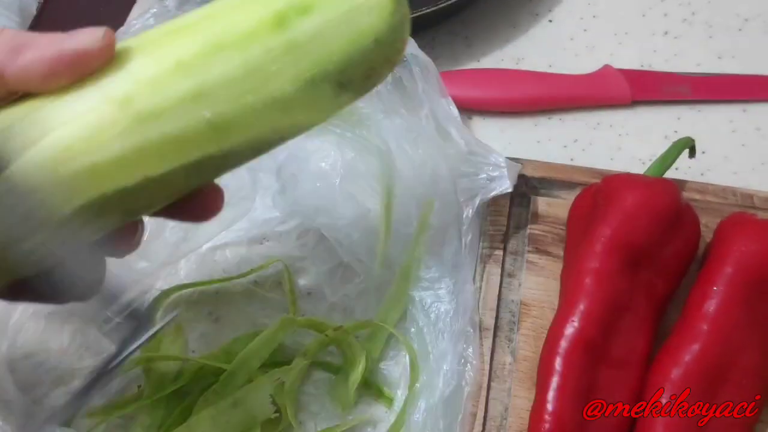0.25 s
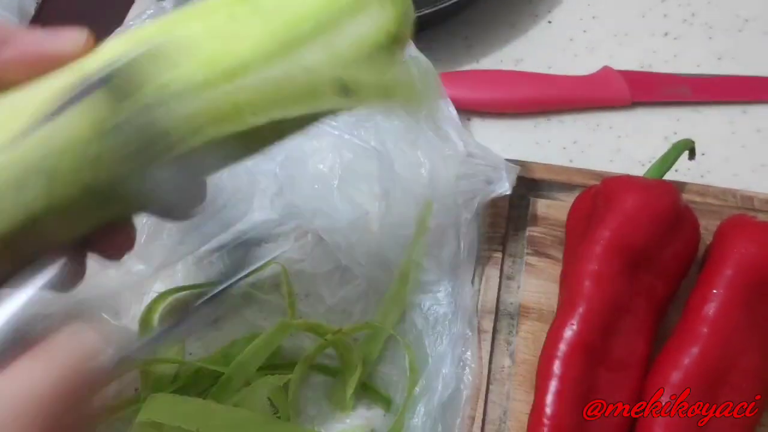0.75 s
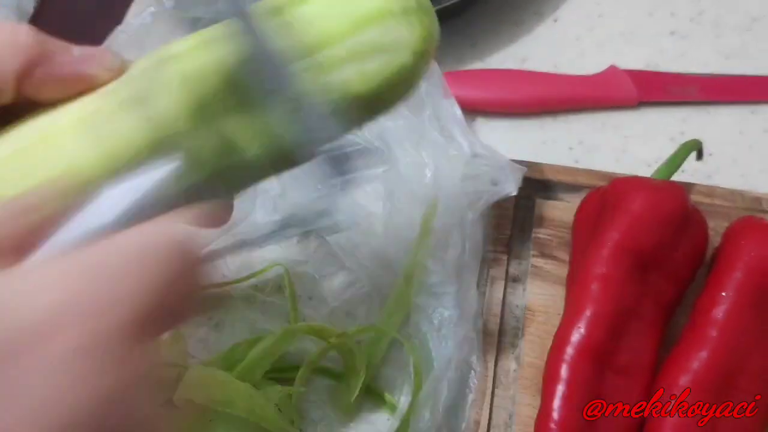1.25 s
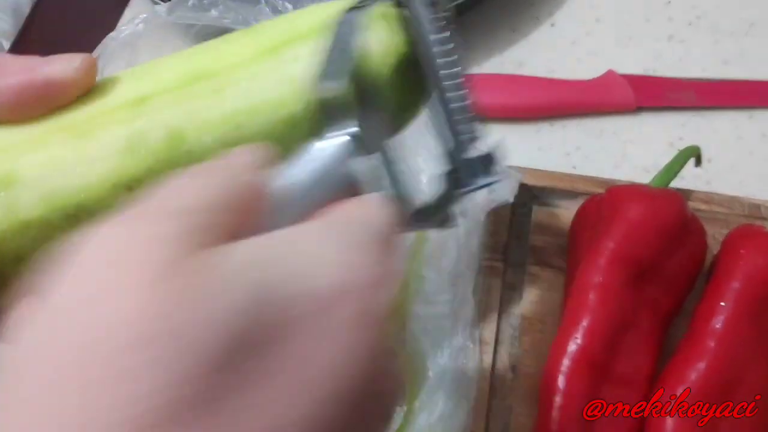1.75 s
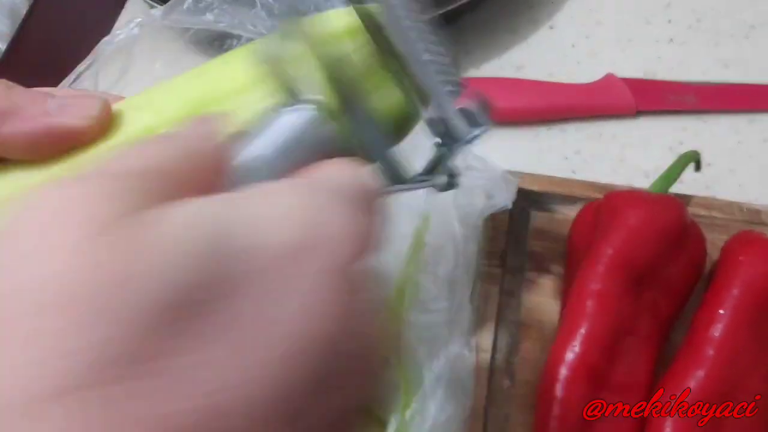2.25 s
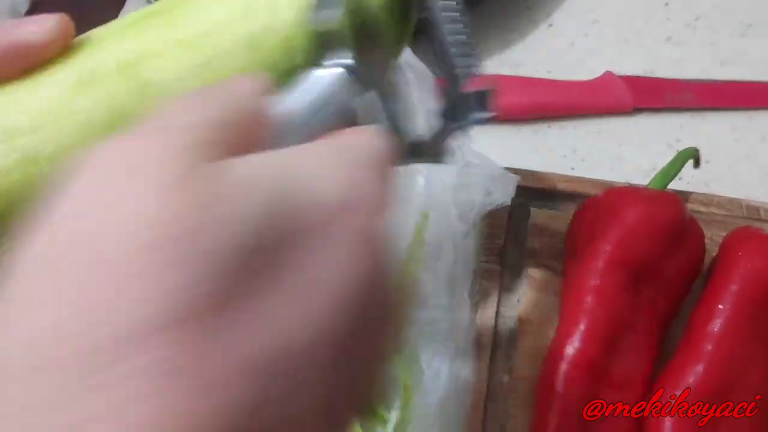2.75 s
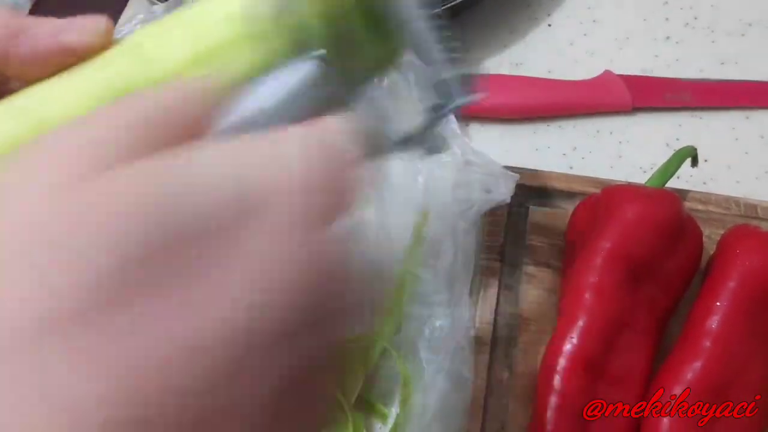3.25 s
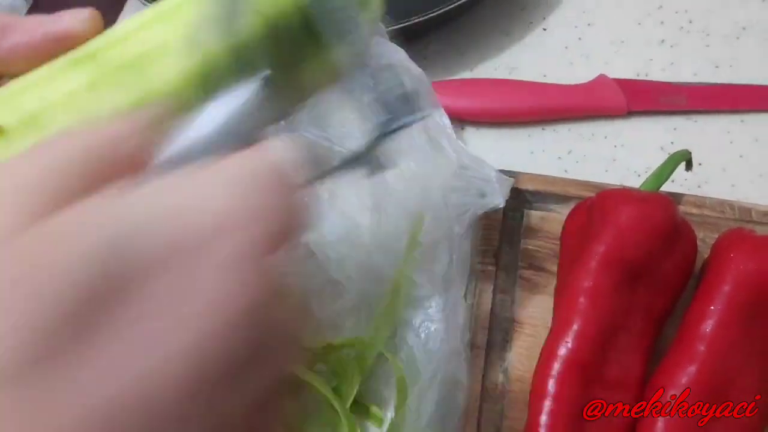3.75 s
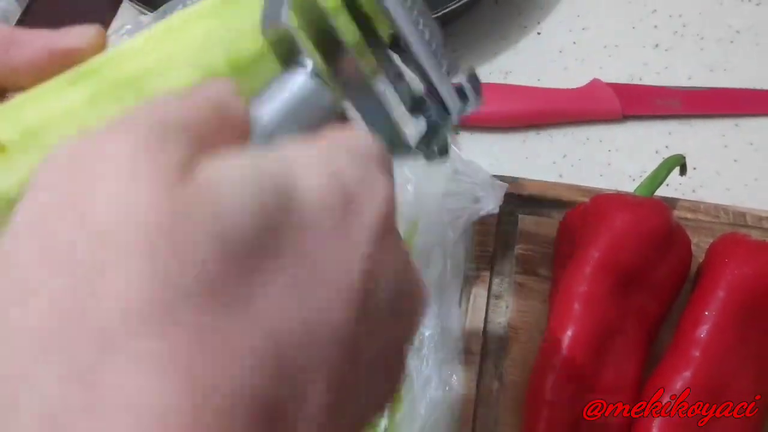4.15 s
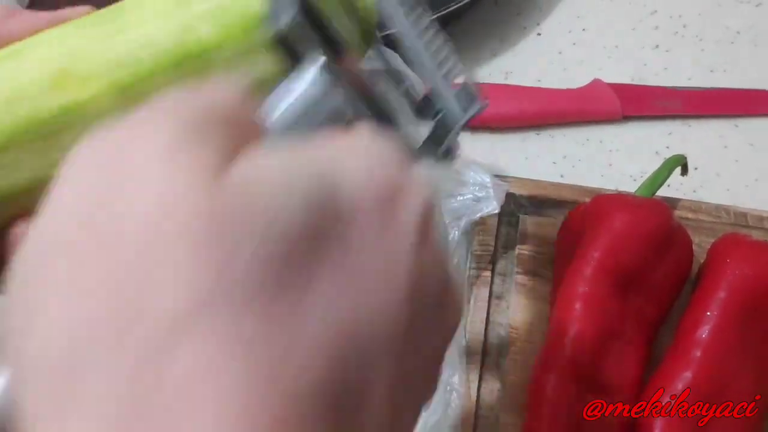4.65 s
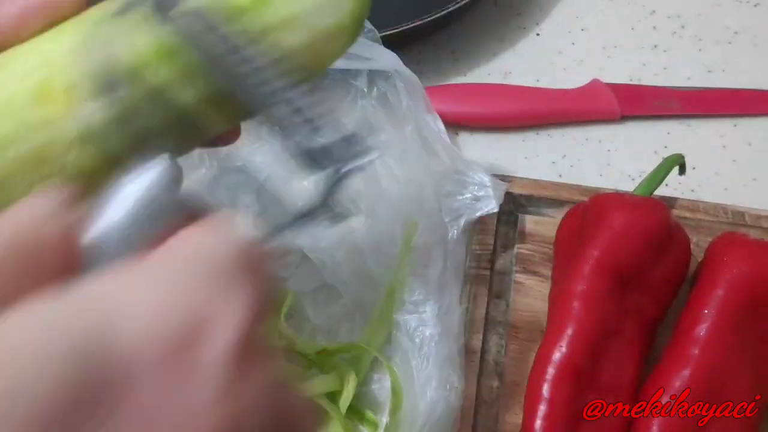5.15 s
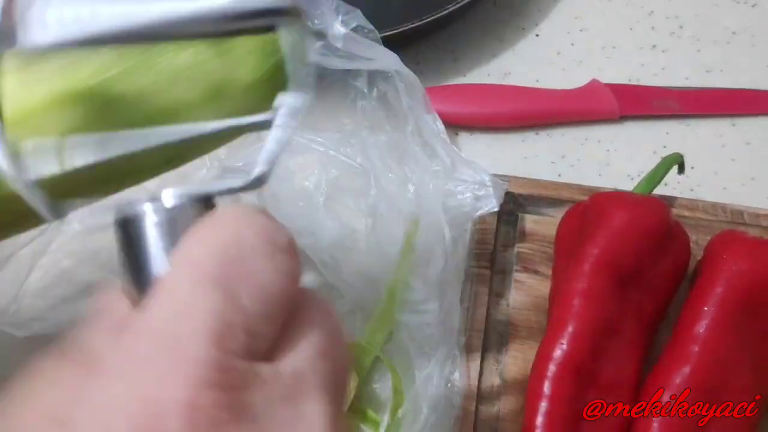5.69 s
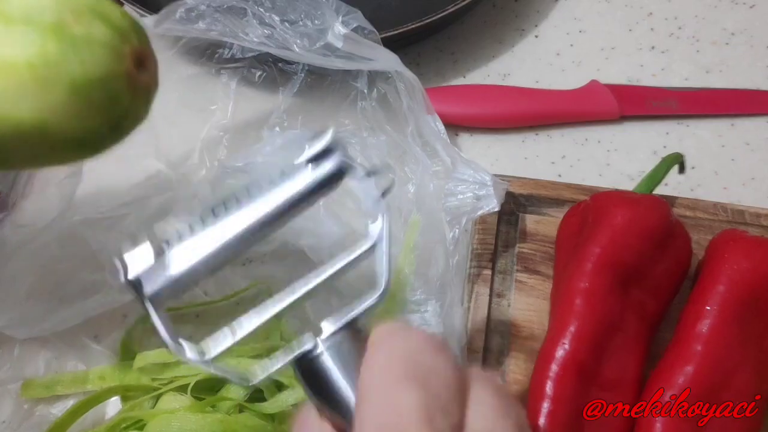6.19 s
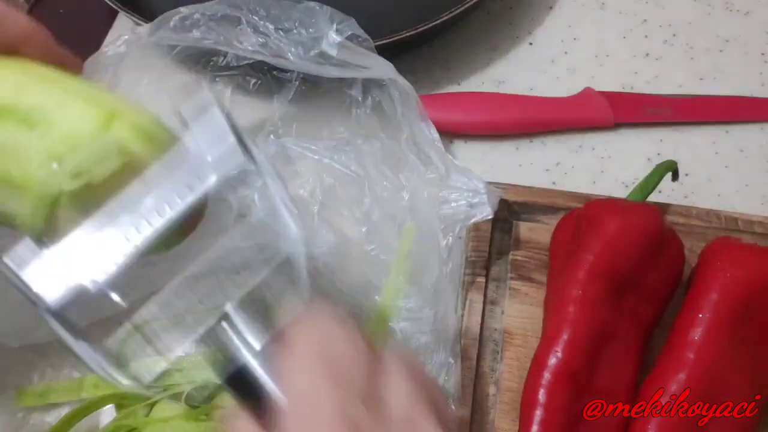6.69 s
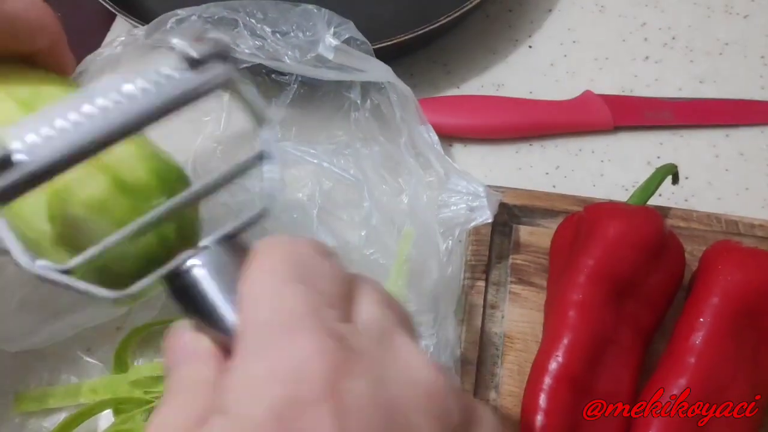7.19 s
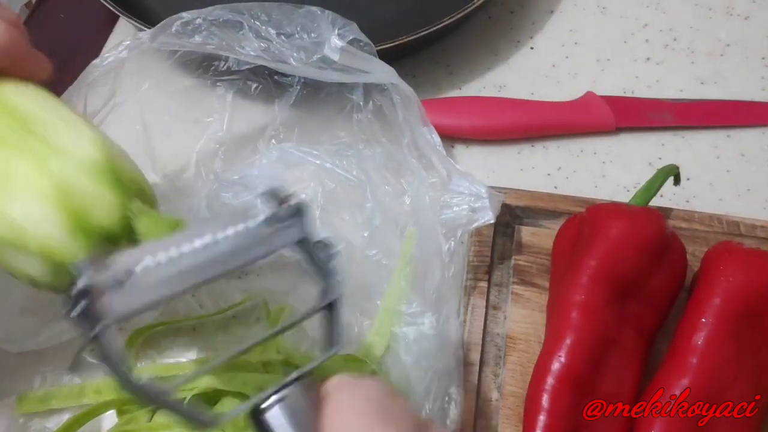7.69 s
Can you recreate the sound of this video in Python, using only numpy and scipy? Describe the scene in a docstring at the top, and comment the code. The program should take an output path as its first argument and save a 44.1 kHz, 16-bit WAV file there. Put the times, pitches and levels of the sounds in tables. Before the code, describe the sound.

Close up in a small kitchen, a loose peeler blade clicks and chatters as it scrapes along a marrow again and again, with brief hisses through the skin and soft knocks on the flesh. The uneven strokes continue throughout, turning slightly lighter in the last two seconds. All this is heard on the right over a low, quiet hum, while the left holds a faint buzz with tiny crackles in the first half.

```python
"""Peeling a marrow in a small kitchen, close to the microphone. From the start an appliance hums on the
right; the left input is deaf and carries only circuit noise, a buzz and, in the first half, crackles.
A steel peeler sets off in quick strokes: its loose swivel blade clacks and chatters in the frame, bites
and hisses through the skin, and the room answers, all on the right. From about 6 s the strokes reach
the tip, where flesh and frame sound a little lighter."""
import sys
import numpy as np
from scipy import signal
from scipy.fft import rfft, irfft, next_fast_len
from scipy.io import wavfile
from scipy.ndimage import uniform_filter1d, map_coordinates

SR = 44100
rng = np.random.default_rng(int(sys.argv[2]) if len(sys.argv) > 2 else 0)


def store_pcm(level_fs):
    """Save levels as 16-bit WAV."""
    pcm = np.round(np.clip(level_fs, -1, 1) * 32767).astype(np.int16)
    wavfile.write(sys.argv[1], SR, np.atleast_2d(pcm).T)


N = 349696
TIP_S = 5.8  # the peeler reaches the tip


def amp(db):
    return 10 ** (np.asarray(db) / 20)


def unit(x):
    return x / np.sqrt(np.mean(x ** 2) + 1e-20)


def along(points, hz):
    """Read (f/Hz, value) points on a log axis."""
    f, v = np.transpose(points)
    return np.interp(np.log(hz + 1), np.log(f + 1), v)


def wobble(rate):
    """A smooth random curve, rate knots a second."""
    return map_coordinates(rng.standard_normal(int(N * rate / SR) + 4), [np.arange(N) * rate / SR])


def filtered(x, response):
    """x times a response of frequency."""
    m = next_fast_len(N + SR // 2)
    return irfft(rfft(x, m) * response(np.fft.rfftfreq(m, 1 / SR)), m)[..., :N]


def coloured(x, spectrum):
    """x through a spectrum scaled so that white noise keeps its rms."""
    power = np.mean(amp(along(spectrum, np.linspace(0, SR / 2, 4096))) ** 2)
    return filtered(x, lambda hz: amp(along(spectrum, hz))) / np.sqrt(power)


def steady_noise(spectrum):
    """Noise at an absolute level per Hz."""
    return filtered(rng.standard_normal(N), lambda hz: amp(along(spectrum, hz))) * np.sqrt(SR / 2)


def grit(rate, depth_db):
    """Noise in uneven grains, rate grains a second."""
    return unit(rng.standard_normal(N) * amp(depth_db * np.tanh(wobble(rate))))


def bursts(starts, levels, rises, holds, t60):
    """Envelope of events that swell, hold and die; times in s, levels in dB."""
    env, t = np.zeros(N + SR), np.arange(SR // 8) / SR
    for s, level, rise, hold in zip(starts, levels, rises, holds):
        swell_db = -18 * np.maximum(1 - t / rise, 0)
        decay_db = -60 * np.maximum(t - rise - hold, 0) / t60
        env[round(s * SR):][:len(t)] += amp(level + swell_db + decay_db)
    return env[:N]


# Blips of one buzz cycle: t/ms, sign, level/dB, width/ms, jitter/ms
BUZZ_BLIPS = [(8.35, -2.2, -66, 0.46, 0.13), (10, -1.6, -67.5, 0.83, 0.39), (16.35, 0.93, -53.5, 1.2, 0.19),
              (23.2, -1.17, -57, 2.2, 1.07), (25.8, 1, -62, 1.6, 1.8)]
def buzz(cycle_hz=30):
    """Supply current steps up and down in a set order, each step a soft blip a little off time."""
    out = np.zeros(N + SR)
    cycles = np.arange(int(N / SR * cycle_hz) + 1)
    t_ms = np.arange(-256, 256) / SR * 1000
    for ms, sign, db, width, jitter in BUZZ_BLIPS:
        late, size = rng.standard_normal((2, len(cycles)))
        drift = 0.64 * wobble(2)[np.minimum(cycles * SR // cycle_hz, N - 1)]
        starts = cycles / cycle_hz + (ms + jitter * (late + drift)) / 1000
        steps = np.zeros(N + SR)
        steps[(starts * SR).astype(int)] = amp(db + 2.6 * size)
        out += sign * signal.fftconvolve(steps, np.exp(-(2 * t_ms / width) ** 2), "same")
    return out[:N]


# Noise floor of the left input: f/Hz, level/dB per Hz
CIRCUIT_NOISE = [(25, -98), (60, -94.5), (120, -93), (250, -95.5), (500, -95.5), (800, -99), (1700, -105),
                 (3000, -106), (7000, -112), (13000, -118)]
# Its crackles: t/s, level/dB
INPUT_CRACKLES = [(0.147, -50.5), (0.363, -48), (0.469, -44), (0.89, -49), (1.184, -50.5), (1.386, -56),
                  (1.502, -53), (1.702, -58), (1.806, -51.5), (2.14, -53), (2.725, -53), (3.014, -49),
                  (3.025, -58), (3.282, -53), (3.481, -50.5), (3.546, -52), (3.75, -54), (3.853, -51),
                  (4.055, -54)]
def deaf_input():
    """No sound of the room, only wavering circuit noise, the buzz and a few crackles."""
    s, db = np.transpose(INPUT_CRACKLES)
    rise = np.full(len(s), .004)
    crackle = bursts(s - rise, db, rise, rise / 4, t60=0.0071) * grit(1300, depth_db=-1.0)
    crackle = coloured(crackle, [(100, 2), (1000, 4.5), (4000, -9.0), (14000, -14.5)])
    return amp(0.64 * wobble(3.926)) * steady_noise(CIRCUIT_NOISE) + buzz() + crackle


# Appliance tones at the microphone: f/Hz, level/dB rms
MOTOR_TONES = [(48.4, -71.5), (98, -72), (123, -76), (178.4, -70.5), (189.5, -76), (199.9, -68), (368, -77),
               (378.9, -70), (412.6, -74), (423.7, -65.5), (434.8, -71)]
# Room tone: f/Hz, level/dB per Hz
ROOM_TONE = [(25, -84.5), (45, -90.5), (80, -96), (130, -85.5), (190, -82), (230, -87.5), (330, -94.5),
             (500, -93), (800, -102), (1500, -107), (3000, -109), (5000, -108), (8000, -106), (13000, -114)]
def appliance_hum():
    """A slightly unsteady motor over the room tone."""
    t, tones = np.arange(N) / SR, np.zeros(N)
    for hz, db in MOTOR_TONES:
        level = amp(db + 0.51 * wobble(4.4))
        phase = 0.64 * wobble(3) + 2 * np.pi * rng.random()
        tones += level * np.sin(2 * np.pi * hz * t + phase)
    return np.sqrt(2) * tones + steady_noise(ROOM_TONE)


# Reverberation of the kitchen: f/Hz, t60/s
KITCHEN_DECAY = [(500, 0.77), (3000, 0.24), (9000, 0.22), (14000, 0.17)]
def kitchen(x):
    """The small room answers about 3 ms late, each frequency dying at its own speed."""
    hz, t, z = signal.stft(rng.standard_normal(SR // 2), SR, nperseg=256)
    tail = signal.istft(z * amp(-60 * t / along(KITCHEN_DECAY, hz)[:, None]), SR, nperseg=256)[1]
    return signal.fftconvolve(np.pad(x, (150, 0)), tail / np.linalg.norm(tail))[:N]


# The whole marrow in the hand: f/Hz, relative level/dB
MARROW_BODY = [(120, -15), (400, -5.5), (1400, -17)]
def marrow_thump(s, db, rise, hold, landing):
    """Only hard blows move the whole marrow: 2 dB of thump per dB of blow, more on landing."""
    thump_db = 2 * db - 14 + 3.5 * landing
    return coloured(bursts(s, thump_db, rise, hold / 2, t60=0.037) * rng.standard_normal(N), MARROW_BODY)


# Wet flesh, struck or cut: f/Hz, relative level/dB
WET_FLESH = [(300, -11.5), (800, -8.5), (1350, 0.5), (1800, -4.5), (2600, -0.5), (4000, -8.5)]
def flesh_thud(s, db, rise, hold, chance_db):
    """The flesh thuds under each blow, less at the tip."""
    thud_db = 0.7 * db - 26.5 - 3 * (s > TIP_S) + chance_db
    return coloured(bursts(s, thud_db, rise, hold, t60=0.042) * grit(400, depth_db=2.0), WET_FLESH)


# Hollow frame of the peeler: f/Hz, relative level/dB
HOLLOW_FRAME = [(1800, -19), (2900, -11), (3700, 0.5), (4400, -3), (5200, -10)]
def frame_knock(s, db, rise, hold, landing):
    """The blade knocks its frame, harder on landing, less in the short strokes at the tip."""
    knock_db = db - 16 + 4 * landing - 1 * (s > TIP_S)
    return coloured(bursts(s, knock_db, rise, hold, t60=0.047) * grit(600, depth_db=0.0), HOLLOW_FRAME)


# Modes of the blade: f/Hz, relative level/dB, t60/s
BLADE_MODES = [(4210, -18, .06), (5483, -19, .16), (6090, -6, .035), (7795, -10, .11), (8450, -6, .03),
               (9200, -8, .04), (9671, 0, .075), (10924, -4, .075), (12985, -7, .045)]
def steel_ring(drive, starts):
    """Each contact strikes the modes anew; fingers and flesh touch the blade, so its ring flutters."""
    t, ring = np.arange(SR // 3) / SR, np.zeros(N)
    latest = np.clip(np.searchsorted(starts * SR, np.arange(N)) - 1, 0, None)
    strengths = amp(3 * rng.standard_normal((len(starts), len(BLADE_MODES))))  # each lands elsewhere
    for (hz, db, t60), strength in zip(BLADE_MODES, strengths[latest].T):
        mode = amp(db - 60 * t / t60) * np.exp(2j * np.pi * hz * t)
        flutter = amp(4.25 * wobble(120)) * np.exp(0.9j * wobble(90))
        ring += np.real(signal.fftconvolve(drive * strength, mode)[:N] * flutter)
    return ring


ONSET_S, FADE_DB_PER_S = 0.0065, 299
# Hiss of the strokes, drags along the skin and fast-fading tails after hard clacks:
# t/s, length/s, first level/dB, last level/dB
STROKE_HISS = [(0.028, 0.033, -52.5, -56), (0.235, 0.21, -46, -56.5), (0.463, 0.15, -41, -70),
               (0.754, 0.22, -42.5, -58), (1.356, 0.16, -38.5, -53), (1.875, 0.17, -48.5, -50),
               (2.096, 0.11, -40.5, -57), (2.394, .11, -47.5, -47.5), (2.51, 0.18, -42, -66),
               (2.892, 0.14, -51.5, -47), (3.063, 0.097, -32.5, -75), (3.364, 0.17, -43.5, -51.5),
               (3.875, 0.16, -41, -49.5), (4.355, 0.19, -47.5, -45.5), (4.906, 0.14, -52.5, -47),
               (5.096, 0.12, -32, -69), (5.385, 0.11, -50, -49.5), (5.863, 0.17, -33, -58.5),
               (6.182, 0.077, -46.5, -37.5), (6.506, 0.059, -63, -42), (6.73, .035, -51, -60),
               (6.779, .075, -39, -52), (6.874, 0.13, -33.5, -69), (7.039, 0.11, -56, -37.5),
               (7.328, 0.34, -54, -71), (7.688, 0.14, -40.5, -69)]
def hiss_level():
    """Level in dB of the loudest hiss: it swells, glides from first to last level and fades."""
    t = np.arange(N) / SR
    return np.max([np.interp(t, [s - ONSET_S, s, s + length, s + length + 1],
                             [-90, first, last, last - FADE_DB_PER_S])
                   for s, length, first, last in STROKE_HISS], axis=0)


def stroke_grains(level_db):
    """Dense, fluttering grains; in a drag these are cells tearing under the edge."""
    return amp(level_db + 2.15 * wobble(62)) * grit(2000, depth_db=3.5)


# Colour of the hiss: f/Hz, relative level/dB
HISS_COLOUR = [(500, -19), (1300, -19), (2400, -15), (2950, -10.5), (3200, -4.5), (3450, -8), (4800, -10.5),
               (7500, 0.5), (10000, -3.5), (14000, -6.5)]
def stroke_hiss(grains):
    """A bright hiss with the rasp of wet flesh beneath it."""
    return coloured(grains, HISS_COLOUR) + amp(-18.5) * coloured(grains, WET_FLESH)


# Clack of the blade, close up: f/Hz, relative level/dB
BLADE_CLACK = [(2500, -33.5), (4500, -18.5), (5900, -8.5), (7000, -7.5), (9500, -0.5), (11100, -5),
               (14000, -7)]
def blade_clack(s, db, rise, hold):
    """The loose blade catches, then chatters in tiny blows."""
    return coloured(bursts(s, db, rise, hold, t60=0.018) * grit(1400, depth_db=5.0), BLADE_CLACK)


def shifting_grip(x, depth_db):
    """The hand shifts on the tool, so narrow resonances come and go within tens of ms."""
    z = signal.stft(x, nperseg=256)[2]
    field = uniform_filter1d(rng.standard_normal(z.shape), size=4, axis=0)  # across frequency
    field = uniform_filter1d(field, size=8, axis=1)  # across time
    return signal.istft(z * unit(amp(depth_db * unit(field))), nperseg=256)[1][:N]


# Contacts of the swivel blade: t/s, level/dB, catch/ms, chatter/ms
BLADE_CONTACTS = [(0.209, -41, 3.3, 9.7), (0.23, -17, 1.7, 5.2), (0.241, -32, 1.6, 5.7),
                  (0.3073, -31.5, 3.8, 16), (0.3744, -42, 1.1, 4.6), (0.4256, -46, 3.1, 31),
                  (0.4453, -29.5, 10, 5.8), (0.4607, -21, 3.1, 10.2), (0.6328, -51.5, 2.5, 13),
                  (0.6566, -46, 2.4, 4.8), (0.7516, -23.5, 2.1, 7.1), (0.8974, -44, 1.2, 22),
                  (0.953, -38, 2.1, 3.1), (1.0169, -34, 3, 5.8), (1.0468, -48, 2, 6.6),
                  (1.1119, -39.5, 3.9, 7.8), (1.2312, -49.5, 0.95, 4.6), (1.3151, -39.5, 1.8, 5.6),
                  (1.3345, -17, 5.9, 7.5), (1.411, -33.5, 0.8, 19.5), (1.4377, -37.5, 1.4, 8.8),
                  (1.5181, -40, 1.3, 8.7), (1.5424, -30.5, 4.8, 8.8), (1.566, -34.5, 2.7, 2.8),
                  (1.8607, -24.5, 3.7, 14.7), (1.9764, -42.5, 2.2, 22), (2.074, -16.5, 3, 11),
                  (2.2994, -45, 3.2, 4), (2.3923, -29, 4.8, 19.6), (2.5008, -22.5, 3, 4),
                  (2.5085, -31.5, 1.3, 17), (2.5266, -19, 2.1, 5.8), (2.578, -20.5, 8, 8),
                  (2.8655, -27.5, 2.2, 8.1), (2.9882, -37, 1.6, 5.1), (3.007, -40, 2.4, 16),
                  (3.0523, -25.5, 3.9, 6.4), (3.065, -29.5, 2.8, 28.3), (3.1987, -39.5, 2.3, 4.5),
                  (3.283, -45, 7.2, 4.1), (3.3631, -19.5, 11.3, 3.6), (3.5885, -35.5, 1.5, 11.6),
                  (3.628, -47.5, 2.4, 6.5), (3.7783, -38, 1.4, 4), (3.8647, -18.5, 4.2, 9.64),
                  (3.9314, -34.5, 3.5, 7), (3.969, -37.5, 2.4, 8.7), (4.0338, -35.5, 1.1, 4),
                  (4.0401, -40, 1.9, 5.6), (4.0603, -42.5, 1.5, 19), (4.2577, -43, 1.9, 3.2),
                  (4.3215, -29.5, 3.7, 27.6), (4.4475, -40, 1.5, 14), (4.5095, -26, 1.8, 20),
                  (4.566, -33, 1.1, 5.7), (4.5802, -36, 1.3, 7.8), (4.83, -43.5, 1.5, 3.5),
                  (4.8852, -27, 9.5, 7.4), (4.906, -29, 2.5, 4.4), (4.9847, -42, 1.4, 16.5),
                  (5.001, -33, 3.1, 6.3), (5.0456, -40, 5.7, 4.9), (5.0589, -44, 1.2, 4),
                  (5.0741, -30.5, 2.1, 15), (5.092, -18.5, 1.3, 5.7), (5.297, -44, 1, 2.2),
                  (5.3717, -25, 2, 12.4), (5.3898, -26.5, 1.1, 7.2), (5.495, -34, 1.8, 5.3),
                  (5.506, -35.5, 1.9, 3.9), (5.5326, -31, 3.3, 14.4), (5.8257, -39, 1.1, 3.6),
                  (5.858, -20.5, 2.2, 15), (5.9016, -34, 1.1, 14), (5.9472, -26.5, 3.3, 8),
                  (5.9658, -36.5, 1.6, 10), (6.1719, -20, 2.3, 9.9), (6.2018, -39, 1.1, 5.2),
                  (6.2335, -21, 4.1, 3.9), (6.2624, -26.5, 2.5, 9.9), (6.4357, -27.5, 2.6, 24.7),
                  (6.541, -20, 2, 3.6), (6.559, -24.5, 6.6, 10.4), (6.7254, -42, 1.1, 4.4),
                  (6.747, -36.5, 1.1, 4), (6.7605, -15, 6.3, 3.1), (6.8466, -19.5, 1.9, 23),
                  (7.0234, -38.5, 2.3, 5.3), (7.0369, -39, 1.1, 17), (7.046, -17.5, 9.2, 3.6),
                  (7.0997, -33.5, 3, 9.5), (7.119, -31.5, 1.1, 19), (7.1391, -24, 2.9, 9.7),
                  (7.304, -49, 4.8, 4), (7.3356, -31.5, 1.9, 9), (7.3691, -16.5, 1.5, 7.9),
                  (7.3824, -28, 0.44, 14.4), (7.4376, -36, 4.3, 13), (7.467, -30.5, 6.9, 4.9),
                  (7.5096, -31.5, 2.4, 9.9), (7.6287, -30.5, 3, 5.4), (7.638, -40, 1.8, 11),
                  (7.6693, -14, 7.1, 7), (7.7183, -28.5, 0.98, 4.6), (7.7737, -36.5, 1.2, 3.4),
                  (7.8026, -29, 7.5, 4.5), (7.833, -37.5, 2.4, 2.5)]
def peeler(tick_count=8, tick_db=-52, off_skin_db=-63.5):
    """Contacts and faint chance ticks sound blade, frame and marrow; blows and grains ring the steel."""
    ticks = [(when * N / SR, tick_db + 6 * (size - .5), 2.1, 6)
             for when, size in rng.random((tick_count, 2))]
    s, db, catch_ms, chatter_ms = np.transpose(sorted(list(BLADE_CONTACTS) + ticks))
    rise, hold = catch_ms / 1000, np.maximum(chatter_ms - 4, 0) / 1000
    hiss_db = hiss_level()
    landing = hiss_db[((s - ONSET_S) * SR).astype(int)] < off_skin_db  # off the skin just before
    flesh_scatter, frame_scatter, ring_scatter = 2.5 * rng.standard_normal((len(s), 3)).T  # dB
    clack = blade_clack(s, db, rise, hold)
    knock = frame_knock(s, db + frame_scatter, rise, hold, landing)
    thud = flesh_thud(s, db, rise, hold, flesh_scatter)
    thump = marrow_thump(s, db + flesh_scatter, rise, hold, landing)
    grains = stroke_grains(hiss_db)
    # hard blows ring out more; landing on the skin damps them
    blow_db = db - 8.5 + 0.14 * (db + 27) - 2.5 * landing + ring_scatter
    blows = bursts(s, blow_db, rise, hold, t60=0.034) * grit(1100, depth_db=7.5)
    tool = shifting_grip(clack + knock + stroke_hiss(grains), depth_db=2.5)
    ring = steel_ring(blows + amp(-12.5) * grains, s)
    return tool + thud + thump + amp(-25.5) * ring


def scene():
    """Left: the deaf input. Right: the peeler close up, the kitchen behind it."""
    close = peeler()
    return np.array([deaf_input(), close + amp(-12) * kitchen(close) + appliance_hum()])


# Steep loss of treble above 14 kHz, on both channels: f/Hz, level/dB
TREBLE_ROLLOFF = [(14100, 0.5), (14500, -34.5), (15400, -24)]
def record(dry):
    """The treble rolls off and nothing passes the band limit."""
    limit_hz = 15375
    return filtered(dry, lambda hz: amp(along(TREBLE_ROLLOFF, hz)) * (hz < limit_hz))


dry = scene()
out = record(dry)
store_pcm(out)
```